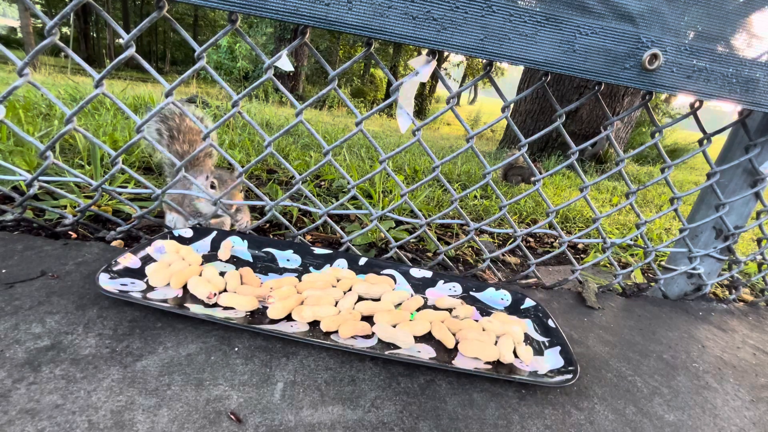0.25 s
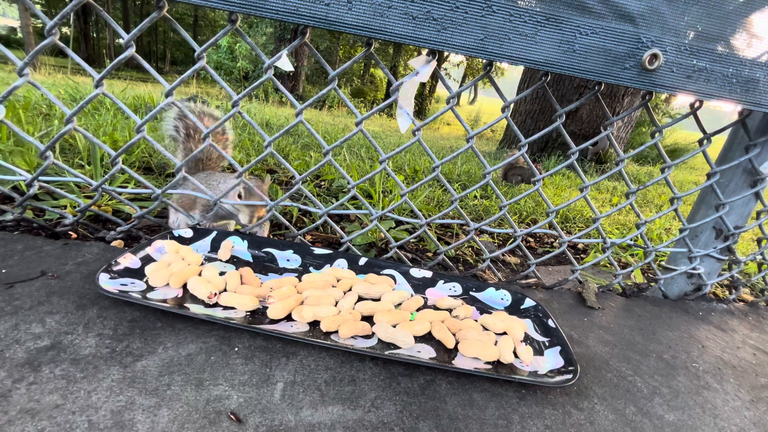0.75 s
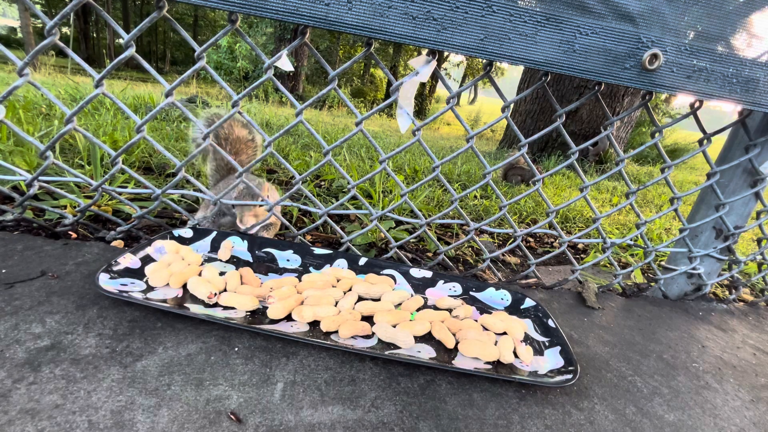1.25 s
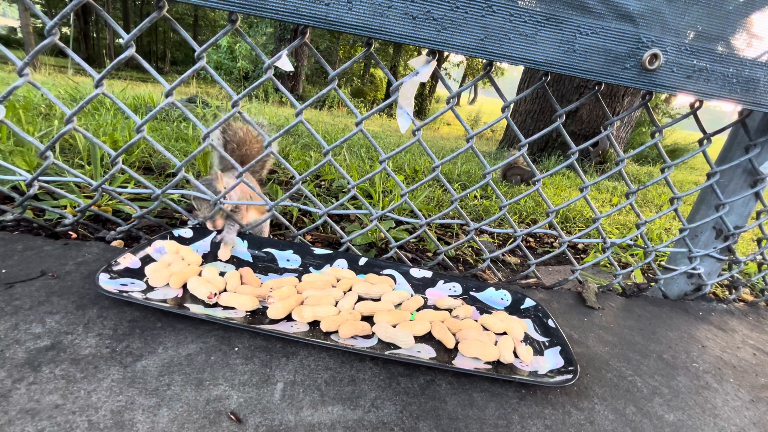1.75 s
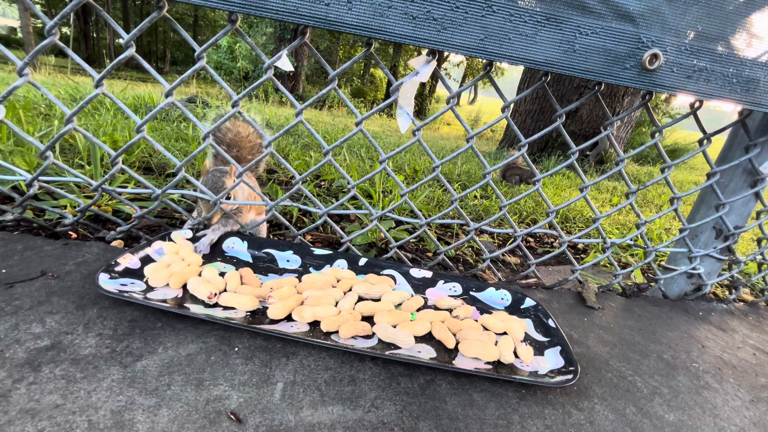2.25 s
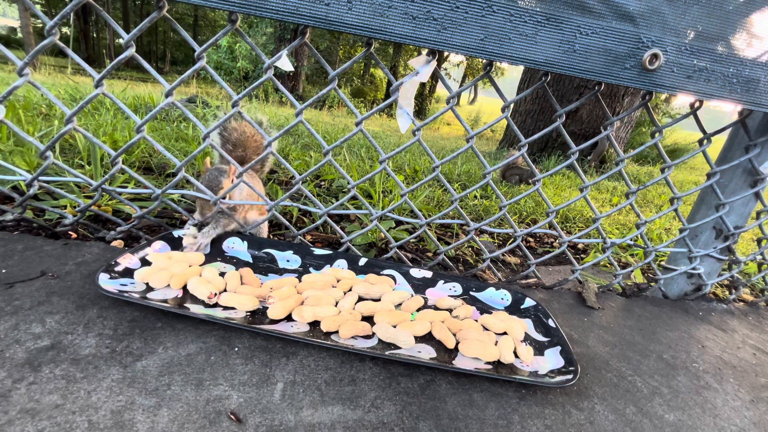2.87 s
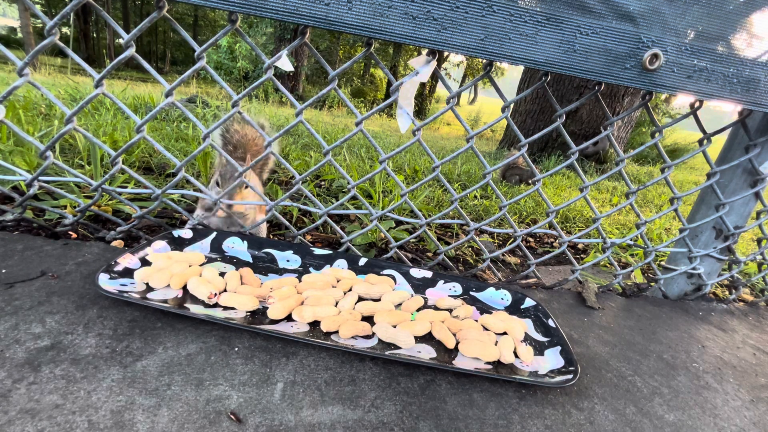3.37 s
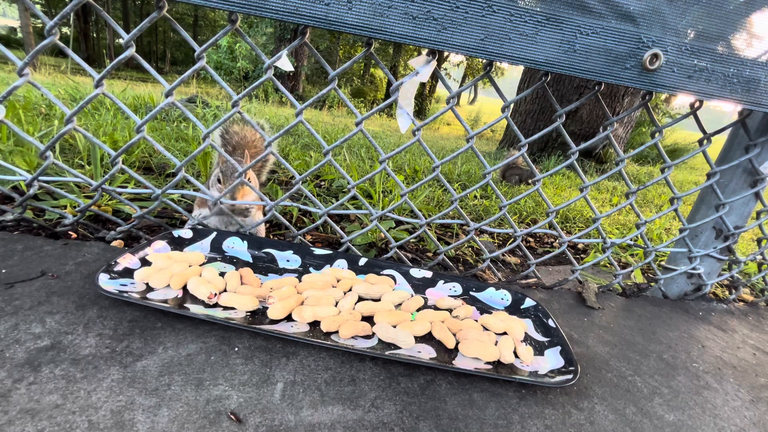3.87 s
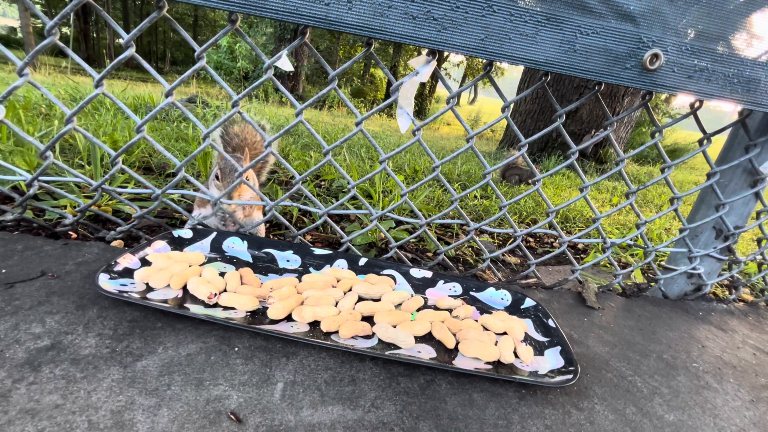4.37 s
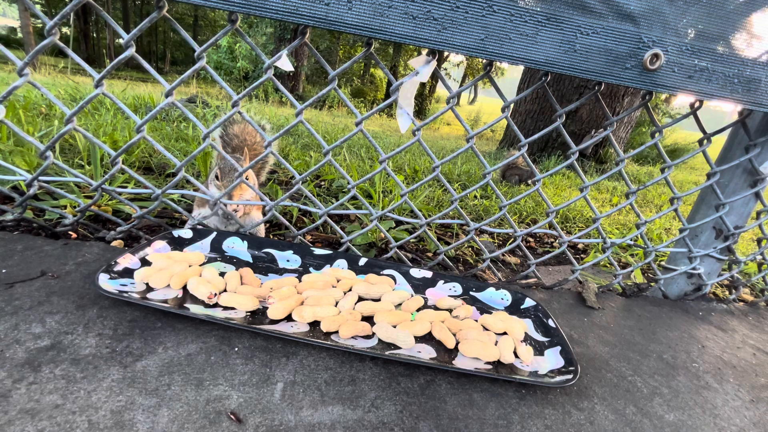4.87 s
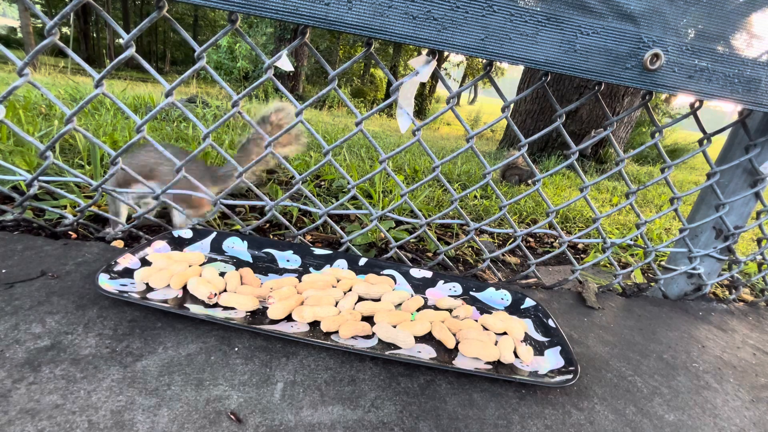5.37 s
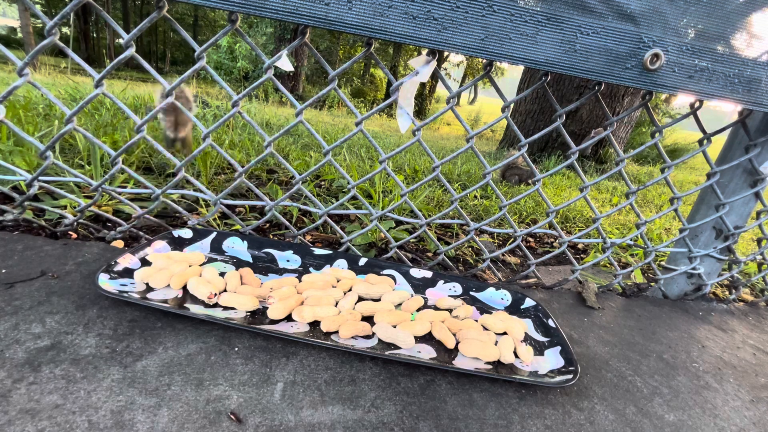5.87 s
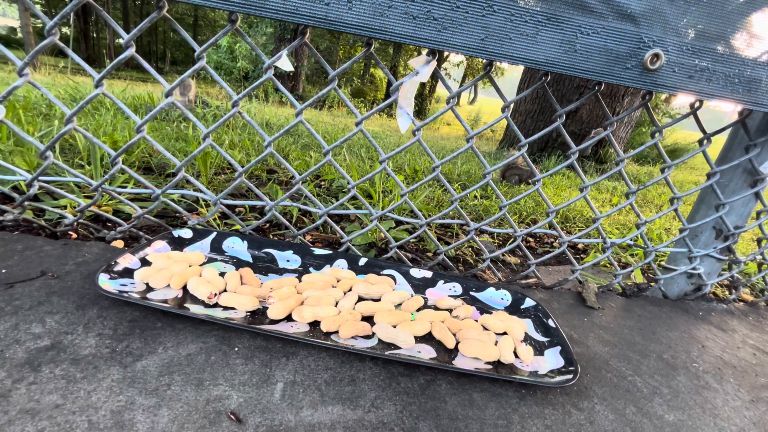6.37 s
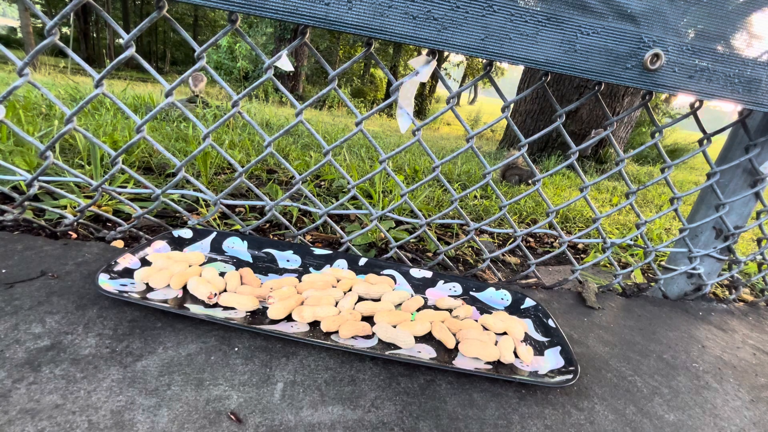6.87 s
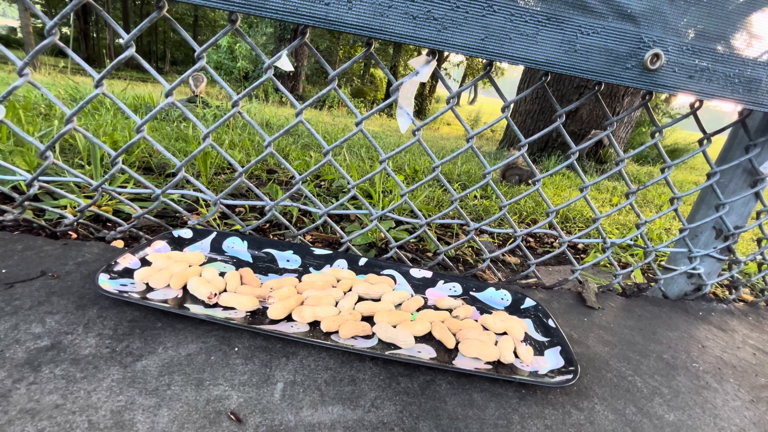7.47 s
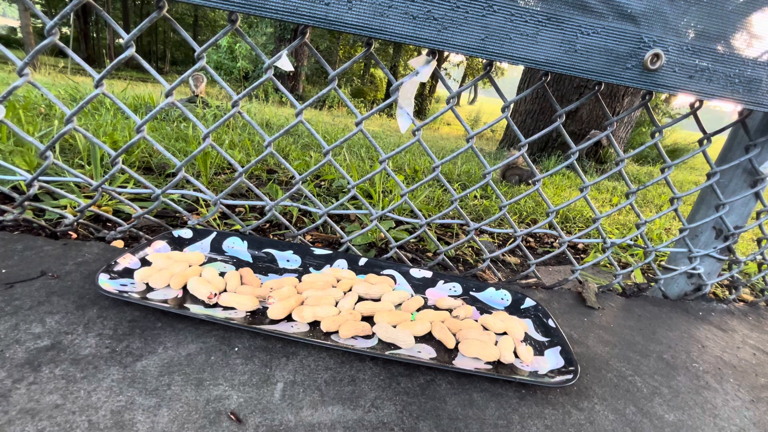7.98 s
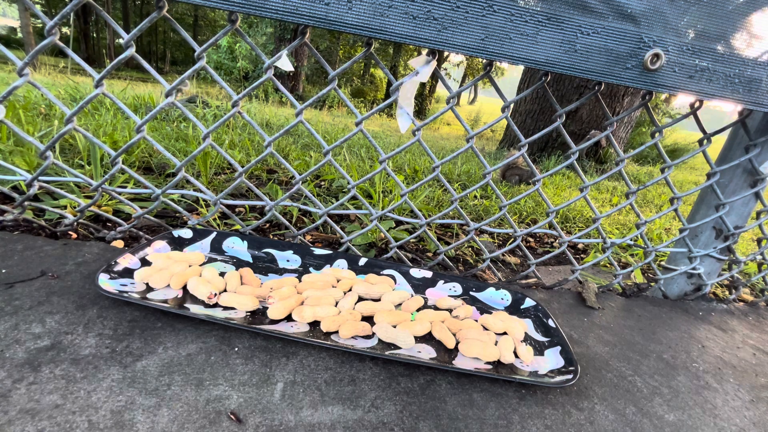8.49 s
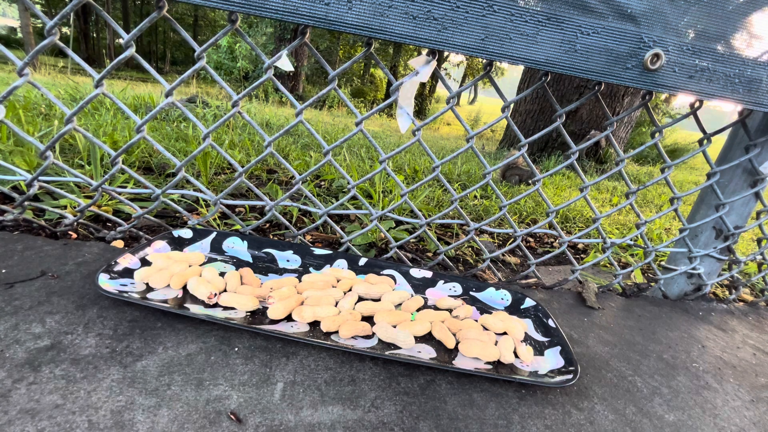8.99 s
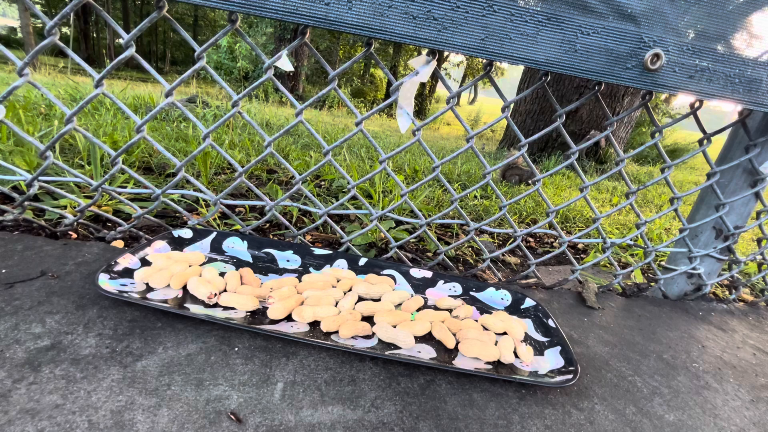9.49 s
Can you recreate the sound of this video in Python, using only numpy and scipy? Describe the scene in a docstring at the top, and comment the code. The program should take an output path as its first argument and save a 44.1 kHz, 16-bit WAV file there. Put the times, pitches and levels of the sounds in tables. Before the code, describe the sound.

A hollow ball is hit with a racket, smacks a practice wall and bounces on the ground, giving regular woody knocks with short court echoes, off to the left. Close to the microphone a small rodent scratches and clicks at a tray of nuts and wire, mostly in the first few seconds. Distant traffic rumbles steadily, birds twitter faintly, and insects hiss very softly.

```python
"""A hollow ball off to the left knocks on racket, practice wall and ground: a noise crack, then a ring of
sine modes before and after the rebound, with delayed, dulled echoes from the court walls. Shoes scuff.
Close by a small rodent scratches at wire and a tray of nuts in gritty noise bursts over a ticking rustle.
Far birds twitter in short sliding sines; shaped noise makes traffic rumble, road hiss and insects."""
import sys
import numpy as np
from scipy import signal
from scipy.fft import rfft, irfft, next_fast_len
from scipy.io import wavfile
from scipy.ndimage import uniform_filter1d, map_coordinates

SR = 44100
rng = np.random.default_rng(int(sys.argv[2]) if len(sys.argv) > 2 else 0)


def transcribe(signal):
    """Save signal, clipped to [-1, 1], as a 16-bit WAV file at the path in sys.argv[1]."""
    frames = np.atleast_2d(signal).T
    limited = np.clip(frames, -1, 1)
    pcm = np.round(limited * 32767).astype(np.int16)
    wavfile.write(sys.argv[1], SR, pcm)


def undo_db(level):
    """Turn decibels back into plain size, where 20 dB means ten times bigger."""
    steps = np.asarray(level, float) / 20
    return 10 ** steps


N = 429534


def unit(x):
    """Scale to rms 1."""
    return x / np.sqrt(np.mean(x ** 2) + 1e-20)


def along(points, hz):
    """Interpolate (Hz, value) points on a log frequency axis."""
    f, v = np.transpose(points)
    return np.interp(np.log(hz + 1), np.log(f + 1), v)


def curve(rows):
    """Interpolate (s, value) rows to one value per sample."""
    return np.interp(np.arange(N) / SR, *np.transpose(rows))


def wobble(rate_hz):
    """Smooth random curve with rate_hz knots a second."""
    knots = rng.standard_normal(int(N * rate_hz / SR) + 4)
    return map_coordinates(knots, [np.arange(N) * rate_hz / SR])


def held_noise(count, hold):
    """Random steps, each held for a number of samples."""
    return np.repeat(rng.standard_normal(count // hold + 1), hold)[:count]


def filtered(x, response):
    """Multiply the spectrum of x by a complex response of frequency."""
    m = next_fast_len(x.shape[-1] + 8192)
    spectrum = rfft(x, m) * response(np.fft.rfftfreq(m, 1 / SR))
    return irfft(spectrum, m)[..., :x.shape[-1]]


def add(track, start_s, sound):
    """Mix a sound into a track from start_s."""
    start = round(start_s * SR)
    track[..., start:start + sound.shape[-1]] += sound


def rush(spectrum, alike, patchy_db):
    """Stereo noise of rms 1 with time-frequency patches of random gain and set left-right likeness."""
    z = signal.stft(rng.standard_normal((2, N)), nperseg=512)[2]
    field = uniform_filter1d(rng.standard_normal(z.shape[1:]), size=6, axis=0)
    field = uniform_filter1d(field, size=14, axis=1)
    pair = signal.istft(z * undo_db(patchy_db * unit(field)), nperseg=512)[1][:, :N]

    def mid_side_gain(hz):
        turn = np.arccos(np.clip(along(alike, hz), -1, 1)) / 2
        return undo_db(along(spectrum, hz)) * [np.cos(turn), np.sin(turn)]

    mid, side = filtered(pair, mid_side_gain)
    return unit(np.array([mid + side, mid - side]))


def reverb(x, decays):
    """Diffuse noise tail per channel in which each frequency dies at its own speed."""
    hz, t, z = signal.stft(rng.standard_normal((2, SR // 2)), SR, nperseg=256)
    decay = undo_db(-60 * t / along(decays, hz)[:, None])
    tail = signal.istft(z * decay, SR, nperseg=256)[1]
    return signal.fftconvolve(x[None], tail / np.linalg.norm(tail[0]), axes=1)


def ports(x, left_over_right_db, left_lead_rad, left_lag_ms=0):
    """Two microphone ports hear one direction with different colour and timing."""
    def half(hz):
        phase = np.interp(hz, *np.transpose(left_lead_rad)) - 2 * np.pi * hz * left_lag_ms / 1000
        return undo_db(along(left_over_right_db, hz) / 2) * np.exp(0.5j * phase)

    return filtered(x, lambda hz: np.array([half(hz), 1 / half(hz)]))


# ball modes: ring multiple [ratio], level_db (before random spread), t60_s (before damping)
BALL_MODES = [(0.86, -16, 0.017), (0.999, 1.5, 0.025), (1.09, -9.5, 0.018), (1.19, -7.5, 0.017),
              (1.35, -19, 0.028), (1.579, -19, 0.033), (2.101, -38, 0.0033)]
# crack spectrum before the surface's emphasis: freq_hz, density_db (per Hz)
CRACK_SPECTRUM = [(880, -21), (1500, -5.5), (2600, -10), (3890, -14), (5560, -13), (7720, -21),
                  (9820, -19.5), (11200, -27.5), (15000, -50)]


def knock(crack_db, crack_hz, ring_db, ring_hz, rebound_db, squashed, contact_s, scuff_db, crack_s, lift_db):
    """The shell cracks at first touch and the air inside rings, again as the squashed ball springs back."""
    t = np.arange(SR // 16) / SR

    def ring(start_s, hz, rise_s, damping):
        u = np.clip(t - start_s, 0, None)
        choke = np.exp(-(u / 0.011) ** 2)  # felt cover swallows the end of the ring
        modes = 0
        for ratio, level_db, t60_s in BALL_MODES:
            decay = undo_db(level_db + rng.normal(0, 2.3) - 60 * damping * u / t60_s)
            modes = modes + decay * np.sin(2 * np.pi * ratio * hz * u)
        return choke * (1 - np.exp(-u / rise_s)) * modes

    def colour(hz):
        peak = 1 + 0.68 / (1 + ((hz - crack_hz) / 900) ** 2)
        low_cut = 1 + (0.44 * crack_hz / (hz + 1)) ** 4
        return undo_db(along(CRACK_SPECTRUM, hz)) * peak / low_cut

    def spike(at_s):
        return undo_db(-60 * np.where(t < at_s, (at_s - t) / 0.006, (t - at_s) / crack_s))

    # squashed: shifted pitch, more damped
    first = ring(0.001244, squashed * ring_hz, 0.001, damping=1.93)
    rebound = undo_db(rebound_db) * ring(contact_s, 0.993 * ring_hz, 0.0042, damping=0.64)
    snap = unit(filtered(rng.standard_normal(len(t)), colour))
    touch_s = 0.0013
    fast = spike(touch_s) + undo_db(lift_db) * spike(touch_s + contact_s)  # cover tears loose at lift-off
    scuff = undo_db(scuff_db - 60 * t / 0.091) * (t > 0.0012)
    return undo_db(crack_db) * snap * (fast + scuff) + undo_db(ring_db) * (first + rebound)


def struck(crack_db, ring_db, ring_hz, rebound_db, squashed, echo_db, surface, walls, detours_m):
    """One knock: direct sound with its thud and boards, then a delayed, duller answer of each wall."""
    sound_m_per_s, dulling_hz_s = 343, 278  # corner Hz times delay s
    t = np.arange(SR // 16) / SR
    late = t - surface["contact_s"]  # push of the squashed ball peaks at end of contact
    thud = np.exp(-np.abs(late) / 0.0015) * np.cos(2 * np.pi * 210 * late) * (1 - np.exp(-t / 0.0017))
    boards = undo_db(-60 * t / 0.03) * (1 - np.exp(-t / 0.0021)) * np.sin(2 * np.pi * 655 * t)
    touch = squashed, surface["contact_s"], surface["scuff_db"], surface["crack_s"], surface["lift_db"]
    sound, echoes = np.zeros((2, SR // 3))
    add(sound, 0, undo_db(crack_db + surface["thud_db"]) * thud)
    add(sound, 0, undo_db(ring_db + surface["boards_db"]) * boards)
    add(sound, 0, knock(crack_db, surface["crack_hz"], ring_db, ring_hz, rebound_db, *touch))
    for wall, detour_m in zip(walls, detours_m):
        delay_s, crack_over_db, crack_hz, ring_over_db, pitch, wall_rebound_db = wall
        echo_hz = pitch * ring_hz * rng.normal(1, 0.016)
        echo_ring_db = ring_db + ring_over_db + echo_db
        echo = knock(crack_db + crack_over_db, crack_hz, echo_ring_db, echo_hz, wall_rebound_db, *touch)
        dull = filtered(echo, lambda hz: 1 / np.sqrt(1 + (hz * delay_s / dulling_hz_s) ** 4))
        add(echoes, delay_s + detour_m / sound_m_per_s, dull)
    return sound, echoes


# racket strokes: start_s, crack_db, ring_db, ring_hz, player's step across_m, step back_m
STROKES = [(0.923, -22.5, -29.5, 934, -0.22, 0.3), (2.6274, -19.5, -27, 910, 0.26, 1.5),
           (4.3977, -23, -31.5, 922, -0.049, -1.5), (6.2594, -21.5, -27, 914, -.3, -1),
           (8.082, -23, -31, 952, 0.79, -2.5)]
# hits high on the practice wall: start_s, crack_db, ring_db, ring_hz, place_m along the wall
WALL_HITS = [(1.6336, -23.5, -10, 1023, 0.58), (3.233, -25, -11, 1018, -1), (4.9829, -24, -12, 1028, .03),
             (6.9073, -24.5, -12, 1046, -0.082)]
# bounces on ground and foot of wall: start_s, crack_db, ring_db, ring_hz, rebound_db (over first ring),
# squashed pitch [ratio], echo_db (ring in echoes), left_lag_ms
BOUNCES = [(0.219, -32.5, -28, 970, -3, 1.06, 0.5, 0.029), (1.9545, -43, -45, 786, -1, 1.2, -3, 0.029),
           (1.976, -31, -20.5, 1004, -4, 1.09, -1.5, 0.15), (3.6637, -33, -24, 1004, -0.5, 0.79, -2, -0.13),
           (5.5826, -35, -26.5, 1125, 2.5, 1.2, -7, -0.11),
           (7.3046, -41.5, -33.5, 1000, 1, 1.1, .1, -0.076), (8.462, -33, -17, 1014, 1, 1.11, -1.5, 0.16),
           (9.2433, -35, -25, 870, -1, 1.26, -6, -0.088)]
# court walls: delay_s, crack_over_db, crack_hz, ring_over_db (over direct), pitch [ratio], rebound_db
# side pair after strokes: one nears as the other recedes
SIDE_WALLS = [(0.0198, -6, 5220, 14, 1.045, 7.5), (0.033, -8.5, 5200, 3, 1.013, 9.5)]
# other walls after strokes, same columns: delay_s, crack_over_db, crack_hz, ring_over_db, pitch, rebound_db
END_WALLS = [(.0105, -30, 2900, -5, 1.07, 8.5), (.046, -30, 2900, -3, 0.955, 3),
             (.077, -32, 2900, -3.5, 1.04, 4), (.061, -20.5, 2900, 3, 1.017, 0.81),
             (.108, -31, 3750, -12, 1.3, -1.5), (.164, -41, 4500, -14.5, 1.02, 2)]
# after wall hits, same columns: delay_s, crack_over_db, crack_hz, ring_over_db, pitch, rebound_db
FLUTTER_WALLS = [(0.0391, -18.5, 3400, -21.5, 0.996, 5.1), (0.0512, -13.5, 3400, -23, 0.96, 2.9),
                 (0.0744, -16.5, 2300, -16.5, 0.986, 3.3), (0.118, -27, 3000, -30, 0.91, 1.8),
                 (.155, -20, 2500, -26.5, .99, 1.5), (.197, -19, 2500, -31, 1.035, 1.3),
                 (.237, -32, 2500, -36, 0.96, 1.5)]
# after bounces, same columns: delay_s, crack_over_db, crack_hz, ring_over_db, pitch, rebound_db
LOW_WALLS = [(.0185, -24.5, 2730, -12, 0.99, .3), (.043, -14.5, 2950, -10, 1.04, 1.3),
             (.063, -23.5, 2500, -13, 1.01, -.3)]
# court reverberation: freq_hz, t60_s
COURT_DECAY = [(300, 0.89), (1000, 0.71), (3000, 0.78), (7000, 0.82), (14000, 0.22)]
# ball's direction, port colour: freq_hz, left_over_right_db
BALL_SIDE = [(60, 0.5), (130, -7.5), (290, 14.5), (640, -1.5), (1000, -3), (1900, 5.5), (3700, 3.5),
             (5500, 11.5), (7700, 10.5), (10000, -3), (15000, -2.5)]
# ball's direction, port phase: freq_hz, left_lead_rad
BALL_LEAD = [(0, -0.5), (300, -0.5), (700, -1), (1100, -0.3), (1600, -0.48), (2500, -1.34), (5500, -2.5),
             (12000, -8)]
# what each surface does to the ball
STRINGS = dict(crack_hz=2500, crack_s=0.0022, contact_s=0.00601, scuff_db=-22, lift_db=-44,
               thud_db=5.5, boards_db=-13, wet_db=-13.5)
BOARDS = dict(crack_hz=2900, crack_s=0.0034, contact_s=0.00422, scuff_db=-17.5, lift_db=-25.5,
              thud_db=5.5, boards_db=-8, wet_db=-15.5)
GROUND = dict(crack_hz=4300, crack_s=0.004, contact_s=0.00695, scuff_db=-14, lift_db=-18,
              thud_db=7, boards_db=-8.5, wet_db=-12.5)


def ball():
    """Strokes, wall hits and bounces from the left, each with a fresh diffuse tail of the court."""
    strings_rebound_db, boards_rebound_db = 15, 0.5  # over first ring
    squashed = 1.035  # pitch ratio
    player_lag_ms, wall_lag_ms, echo_lag_ms = 0.24, 0.028, 0.1  # left port
    direct, tails, knocks = np.zeros((2, N + SR)), np.zeros((2, N + SR)), []
    for start_s, *hit, across_m, back_m in STROKES:
        detours_m = [-across_m, across_m] + [back_m] * len(END_WALLS)
        pair = struck(*hit, strings_rebound_db, squashed, 0, STRINGS, SIDE_WALLS + END_WALLS, detours_m)
        knocks.append((start_s, STRINGS, player_lag_ms, pair))
    for start_s, *hit, place_m in WALL_HITS:
        detours_m = [place_m] * len(FLUTTER_WALLS)
        pair = struck(*hit, boards_rebound_db, squashed, 0, BOARDS, FLUTTER_WALLS, detours_m)
        knocks.append((start_s, BOARDS, wall_lag_ms, pair))
    for start_s, *hit, lag_ms in BOUNCES:
        pair = struck(*hit, GROUND, LOW_WALLS, np.zeros(len(LOW_WALLS)))
        knocks.append((start_s, GROUND, lag_ms, pair))
    for start_s, surface, lag_ms, (sound, echoes) in knocks:
        add(direct, start_s, ports(sound, BALL_SIDE, BALL_LEAD, lag_ms))
        add(direct, start_s, ports(echoes, BALL_SIDE, BALL_LEAD, echo_lag_ms))
        add(tails, start_s + 0.014, undo_db(surface["wet_db"]) * reverb(sound + echoes, COURT_DECAY))
    return (direct + undo_db([[1.5], [-1.5]]) * tails)[:, :N]


# sole scuffs: start_s, length_s, level_db (before envelope)
SCUFFS = [(4.777, 0.083, -45.5), (8.272, 0.11, -58.5)]
# sole spectrum: freq_hz, density_db (per Hz)
SOLE_SPECTRUM = [(590, -42), (1000, -5), (1670, 1.5), (2600, -13.5), (4120, -9.5), (5600, -5.5),
                 (8000, -12.5), (10500, -5), (13000, -19), (15000, -29)]


def shoes():
    """A sole drags over the court: gritty noise that swells fast and fades as the foot stops."""
    track = np.zeros(N + SR)
    for start_s, length_s, level_db in SCUFFS:
        u = np.arange(round(length_s * SR)) / (length_s * SR)
        grit = undo_db(3.4 * held_noise(len(u), 40)) * rng.standard_normal(len(u))
        noise = unit(filtered(grit, lambda hz: undo_db(along(SOLE_SPECTRUM, hz))))
        envelope = (1 - np.exp(-u / 0.14)) * (1 - u) ** 0.99
        add(track, start_s, undo_db(level_db) * noise * envelope)
    return ports(track[:N], BALL_SIDE, BALL_LEAD, left_lag_ms=-0.082)


# claws on wire, tray and shells: start_s, level_db (before envelope), t60_s, tray_over_db
SCRATCHES = [(0.0347, -55.5, 0.067, 8.5), (0.086, -61, .015, -20), (0.0912, -60, .015, -22),
             (0.102, -51.5, 0.016, -20), (0.1075, -58, .015, -22), (0.1495, -53, .09, -24),
             (0.2522, -49.5, .03, -10), (0.283, -66, 0.033, 21), (0.386, -60, 0.044, -19),
             (0.3955, -60, .015, -22), (0.4181, -41, .022, -14), (0.513, -59, .015, -22),
             (0.5203, -55.5, 0.088, -4), (0.647, -58, .012, -19), (0.667, -58, .04, -7),
             (0.7145, -33, 0.041, -2.5), (1.23, -57.5, 0.17, -18), (1.2594, -54, .1, -8),
             (1.288, -54.5, 0.15, -12), (1.8243, -28, 0.041, -1.5), (2.04, -53, 0.024, 10),
             (2.1196, -53, .16, -14), (2.13, -53, .03, -20), (2.1414, -49, .1, -2),
             (2.168, -32, 0.035, -19), (2.192, -52, 0.11, -5), (2.2223, -48.5, .055, -13),
             (2.342, -32, 0.018, -27), (2.372, -50.5, .11, 0), (2.676, -29.5, .039, -13.5),
             (2.8715, -46.5, 0.099, -12), (2.9315, -55, 0.21, -8), (2.971, -44.5, .044, -8),
             (2.9927, -51.5, 0.098, -6), (3.041, -35, 0.041, -14), (3.255, -35, 0.017, -13),
             (3.3258, -52, .06, -18), (4.306, -56, 0.023, -16), (4.758, -43.5, 0.016, -14),
             (4.8808, -43, 0.02, -27), (5.297, -55, .015, -19), (5.851, -58, .05, -13),
             (8.679, -56.5, 0.04, -24)]
# claw spectrum: freq_hz, density_db (per Hz)
CLAW_SPECTRUM = [(1410, -35), (2400, -15), (2730, -9), (3560, -2.5), (4900, -1.5), (5530, -5),
                 (10000, -6.5), (13200, -3), (15500, -16), (16400, -27)]
# tray modes: freq_hz, level_db (before random spread), t60_s
TRAY_MODES = [(1630, 0, 0.035), (2006, 2.5, 0.051), (4100, -19, 0.022), (5200, -11, 0.02)]
# claws' direction, port colour: freq_hz, left_over_right_db
CLAW_SIDE = [(1000, 11), (2000, 1.5), (4000, 9), (7000, 1.5), (10500, -8), (13500, 1.5)]
# claws' direction, port phase: freq_hz, left_lead_rad
CLAW_LEAD = [(0, 1.5), (2500, 2), (3700, 0.4), (7700, -7.5), (14000, -14)]


def scratches():
    """Each scratch is a gritty burst whose treble dies first, plus tray modes and a scrape."""
    tray_lag_s = 0.0056  # claw skids before it catches the tray
    claws, t = np.zeros(N + SR), np.arange(SR // 5) / SR
    for start_s, level_db, t60_s, tray_over_db in SCRATCHES:
        grit = undo_db(2.5 * held_noise(len(t), 30))  # slips a fraction of a millisecond long
        noise = grit * rng.standard_normal(len(t))
        noise = unit(filtered(noise, lambda hz: undo_db(along(CLAW_SPECTRUM, hz))))
        dull = filtered(noise, lambda hz: 1 / np.sqrt(1 + (hz / 5500) ** 4))
        burst = noise * (undo_db(-60 * t / t60_s) + 3.0 * undo_db(-60 * t / 0.012))
        burst = burst + dull * undo_db(-18.5 - 60 * t / 0.42)
        scrape = grit * rng.standard_normal(len(t))
        scrape = filtered(scrape, lambda hz: 1 / (1 + ((hz - 2100) / 700) ** 4))
        tray = 0.67 * unit(scrape) * undo_db(-60 * t / (2.1 * t60_s))
        for mode_hz, mode_db, mode_t60_s in TRAY_MODES:
            decay = undo_db(mode_db + rng.normal(0, 1.8) - 60 * t / mode_t60_s)
            tray = tray + decay * np.sin(2 * np.pi * mode_hz * t)
        add(claws, start_s, (1 - np.exp(-(t / 0.0034) ** 2)) * undo_db(level_db) * burst)
        tray_rise = 1 - np.exp(-(t / 0.0026) ** 2)
        add(claws, start_s + tray_lag_s, tray_rise * undo_db(level_db + tray_over_db) * tray)
    tail = reverb(claws, [(3000, 0.19), (14000, 0.074)])[:, :N]
    return ports(claws[:N], CLAW_SIDE, CLAW_LEAD) + undo_db(-27.0) * tail


# rustle level: fur and grass, plus the hiss trailing some knocks: time_s, level_db
RUSTLE_LEVEL = [(0.0, -60), (0.51, -76.5), (1.16, -69), (1.33, -94), (1.57, -90), (2.03, -71), (2.49, -80),
                (2.9, -73), (3.33, -81), (4.31, -77.5), (4.88, -75.5), (6.13, -83), (6.32, -68),
                (6.67, -101), (7.16, -79), (7.51, -88), (8.17, -85.5), (9.74, -89)]
# rustle spectrum: freq_hz, density_db (per Hz)
RUSTLE_SPECTRUM = [(1760, -45), (3000, 0.5), (4430, -18), (5220, -6), (6460, -6.5), (12700, -4.5),
                   (14300, -5), (15000, -27), (15600, -90)]


def rustle():
    """Rustle of fur and grass, plus the hiss trailing some knocks: clumpy noise lifted by decaying ticks."""
    t = np.arange(600) / SR
    impulses = (rng.random(N) < 400 / SR) * rng.exponential(0.98, N)  # about 400 a second
    ticks = np.convolve(impulses, undo_db(-60 * t / 0.006))[:N]
    clumps = undo_db(2.2 * wobble(40) + 3 * wobble(600)) * (1 + 1.4 * ticks)
    noise = rush(RUSTLE_SPECTRUM, [(3000, 0.77), (14000, 0.43)], patchy_db=1.0)
    return undo_db(curve(RUSTLE_LEVEL)) * unit(clumps * noise)


def whistle(length_s, start_hz, end_hz, level_db, unsteady):
    """One sliding bird note with a slightly unsteady pitch."""
    t = np.arange(round(length_s * SR)) / SR
    flutter = 1 + unsteady * held_noise(len(t), 90)
    phase = 2 * np.pi * np.cumsum(flutter * np.linspace(start_hz, end_hz, len(t))) / SR
    return undo_db(level_db) * np.sin(np.pi * t / length_s) * np.sin(phase)


# liveliness of the far birds: time_s, level_db (before mix gains)
BIRD_LEVEL = [(0, -89), (.7, -69.5), (1.3, -73.5), (1.7, -72), (2.5, -59.5), (3.5, -94), (4.6, -72),
              (5.5, -67), (5.8, -76), (6.6, -75), (7.1, -68.5), (8, -69), (8.6, -73.5), (9.74, -75)]
# nearer notes: start_s, length_s, start_hz, end_hz, level_db (before mix gains)
BIRD_NOTES = [(0.487, 0.03, 3880, 3270, -63), (0.511, 0.045, 3600, 2700, -62.5),
              (0.56, 0.058, 3100, 3510, -72), (0.795, .03, 3220, 2930, -64),
              (0.816, 0.027, 4600, 4300, -65), (0.852, 0.061, 3060, 2650, -63),
              (1.283, 0.07, 4480, 4300, -69), (1.493, 0.032, 3600, 3090, -65),
              (1.882, 0.035, 3630, 3170, -55), (2.29, 0.022, 4760, 4400, -62),
              (2.323, 0.042, 3490, 3590, -52.5), (3.146, 0.073, 3470, 2940, -62),
              (3.143, 0.066, 3920, 4230, -62.5), (3.74, 0.046, 4290, 3290, -66),
              (3.916, 0.055, 4370, 4150, -68.5), (4.025, 0.045, 3920, 3380, -70),
              (4.55, 0.037, 3520, 3360, -66), (5.12, 0.033, 3370, 3090, -63), (5.19, .03, 3200, 3050, -69),
              (5.242, .025, 4750, 4950, -65), (5.262, 0.021, 4030, 4170, -62),
              (5.279, 0.03, 3490, 3280, -61), (5.295, .05, 2960, 3080, -64), (5.35, .1, 2880, 3010, -66),
              (5.4, .015, 4350, 4150, -64), (5.421, 0.017, 4470, 3720, -60), (5.44, .04, 3200, 2950, -64),
              (5.492, .07, 2950, 3150, -70), (6.037, 0.037, 4740, 4570, -66),
              (6.062, 0.049, 3900, 2860, -62), (6.686, 0.038, 3680, 3420, -69),
              (7.425, 0.03, 4760, 3940, -64), (7.45, 0.046, 3600, 2850, -57), (7.51, .025, 3400, 3280, -68),
              (7.578, .025, 3250, 3380, -71), (7.618, 0.048, 3450, 2970, -71),
              (7.668, .02, 4300, 4100, -66), (7.699, .02, 4300, 3900, -67), (7.836, 0.026, 3290, 2900, -64)]


def birds(count=1300):
    """Short, mostly falling notes scattered among the trees and smeared by them."""
    far, near = np.zeros(N + SR), np.zeros(N + SR)
    for when, long, pitch, fall, size in rng.random((count, 5)):
        start_hz = 2900 + 1900 * pitch ** 1.8
        end_hz = start_hz * (1.04 - 0.2 * fall)
        note = whistle(0.012 + 0.025 * long, start_hz, end_hz, 6 * size, unsteady=0.055)
        add(far, when * N / SR, note)
    for start_s, *note in BIRD_NOTES:
        add(near, start_s, whistle(*note, unsteady=0.03))
    far, near = undo_db(curve(BIRD_LEVEL)) * unit(far[:N]), near[:N]
    clear = undo_db(-12) * far + undo_db(5) * near
    smeared = reverb(far + undo_db(6.0) * near, [(3000, 0.15)])[:, :N]
    return clear * [[1], [-0.6]] + smeared


# rumble level: time_s, level_db (mean of channels)
TRAFFIC_LEVEL = [(0, -34), (3.3, -34), (5.5, -34), (8, -33), (9.74, -33.5)]
# rumble spectrum: freq_hz, density_db (per Hz)
RUMBLE_SPECTRUM = [(12, -80), (20, -23), (27, -24), (30, -34.5), (39, -11.5), (65, 1), (145, -8),
                   (206, -13), (248, -18), (284, -24), (500, -25.5), (650, -52), (1100, -120)]
# left-right likeness of the background: freq_hz, correlation [-1..1]
ALIKE = [(60, 0.98), (120, 0.9), (240, 0.61), (480, -0.44), (950, -0.53), (1890, -0.07), (3770, 0.36),
         (7520, -0.64), (15000, 0.43)]


def traffic():
    """Distant traffic: steady low noise."""
    level_db = curve(TRAFFIC_LEVEL) + np.array([[-0.3], [0.3]])
    return undo_db(level_db) * rush(RUMBLE_SPECTRUM, ALIKE, patchy_db=0.5)


# road hiss spectrum: freq_hz, density_db (per Hz)
ROAD_SPECTRUM = [(150, -25.5), (250, -2), (420, -11), (580, -11.5), (1010, -17), (1640, -27), (2840, -39),
                 (5000, -44), (6500, -51.5), (7500, -56), (14000, -60), (15000, -93.5), (15600, -130)]


def road():
    """Smooth road hiss: broad noise whose level wanders."""
    return undo_db(-47.5 + 1.45 * wobble(1.995)) * rush(ROAD_SPECTRUM, ALIKE, patchy_db=2.0)


# insect spectrum: freq_hz, density_db (per Hz)
INSECT_SPECTRUM = [(4800, -27), (5400, 1.5), (5800, 2.5), (6200, -1), (6700, -26.5)]


def insects():
    """Insects: a narrow noise band whose level wanders a little."""
    return undo_db(-73.5 + 1.5 * wobble(1.56)) * rush(INSECT_SPECTRUM, ALIKE, patchy_db=-2.0)


def scene():
    """Ball, shoes, rodent, birds and background together."""
    rodent = scratches() + rustle()
    background = traffic() + road() + insects()
    return ball() + shoes() + rodent + birds() + background


def band_limit(x):
    """A steep low-pass at the top of the band."""
    return signal.sosfilt(signal.butter(12, 16510, fs=SR, output="sos"), x)


def record(dry):
    """The finished mix as recorded."""
    return band_limit(dry)


dry = scene()
out = record(dry)
transcribe(out)
```